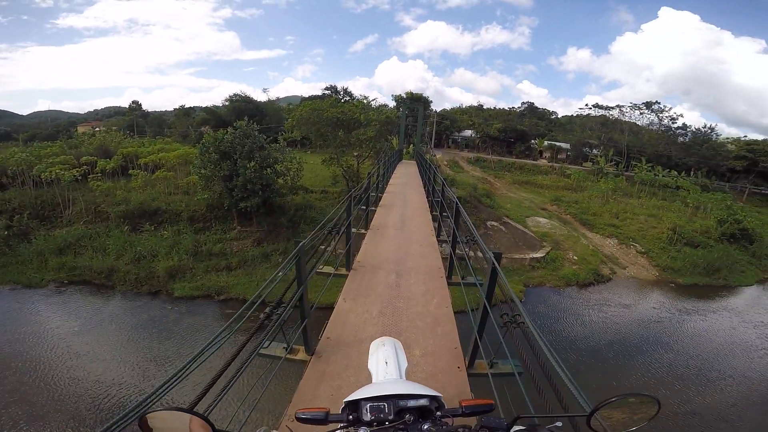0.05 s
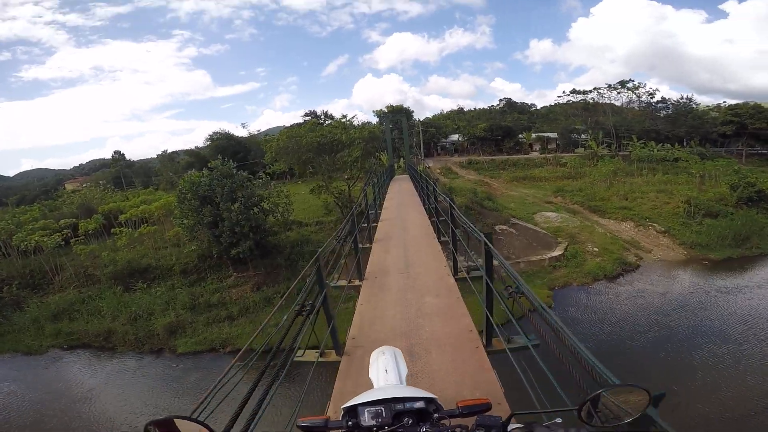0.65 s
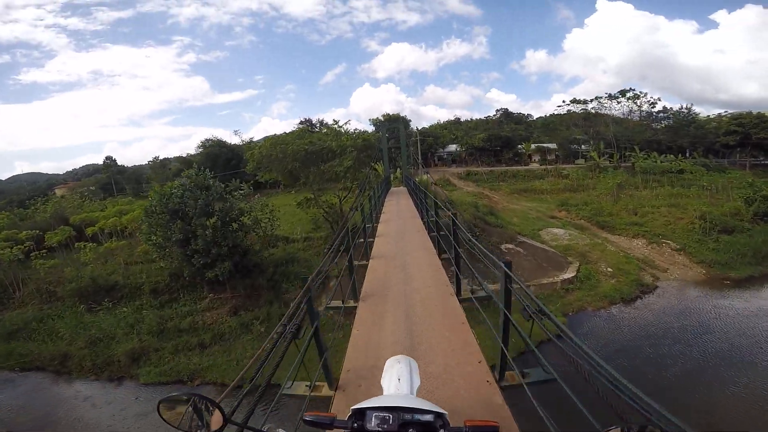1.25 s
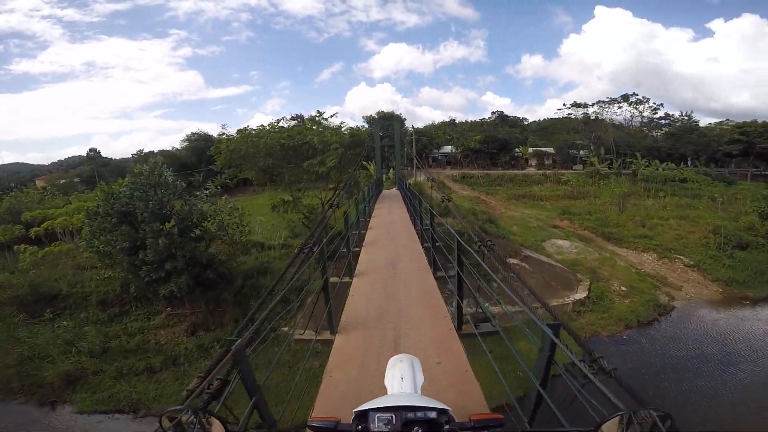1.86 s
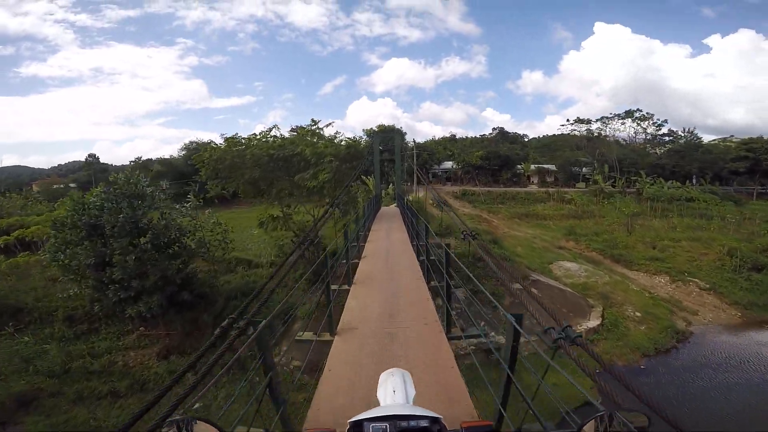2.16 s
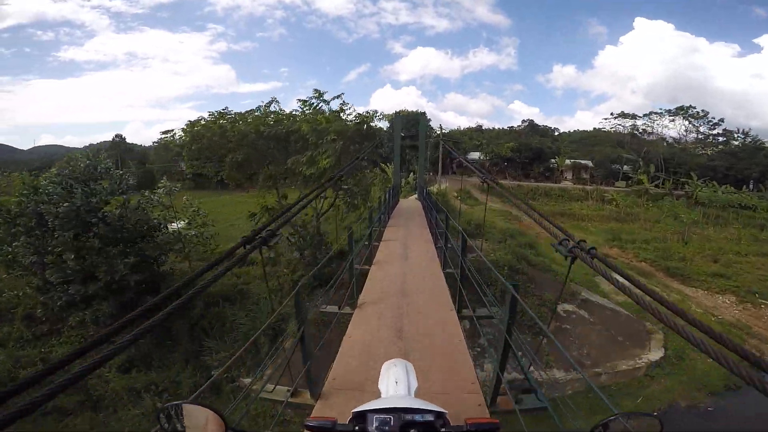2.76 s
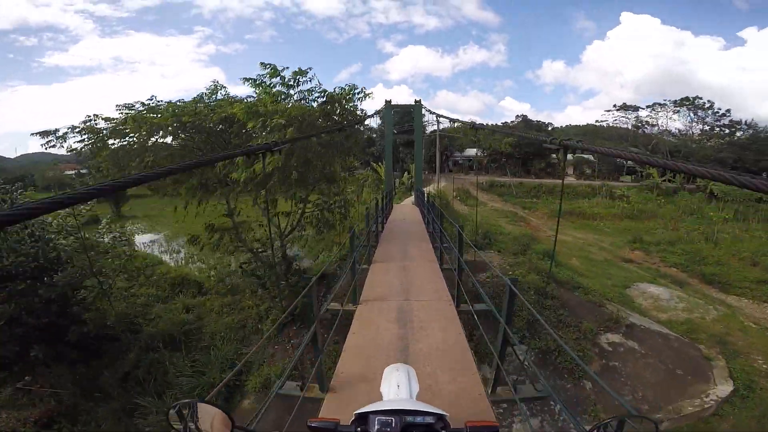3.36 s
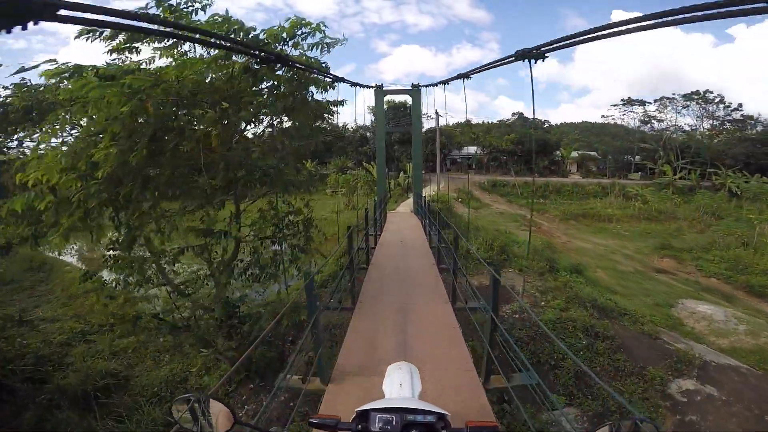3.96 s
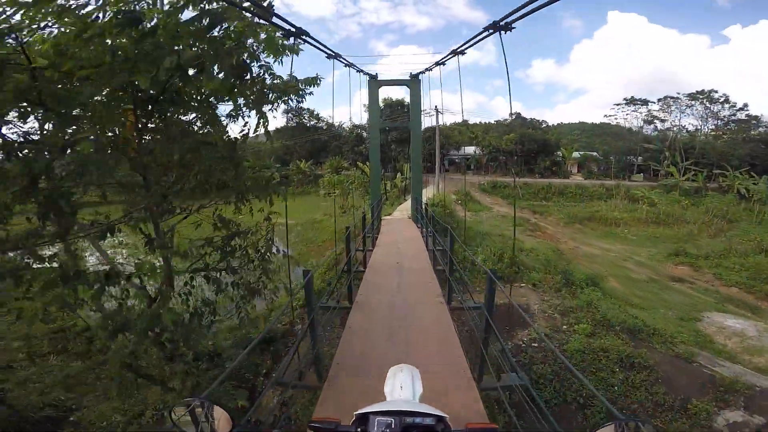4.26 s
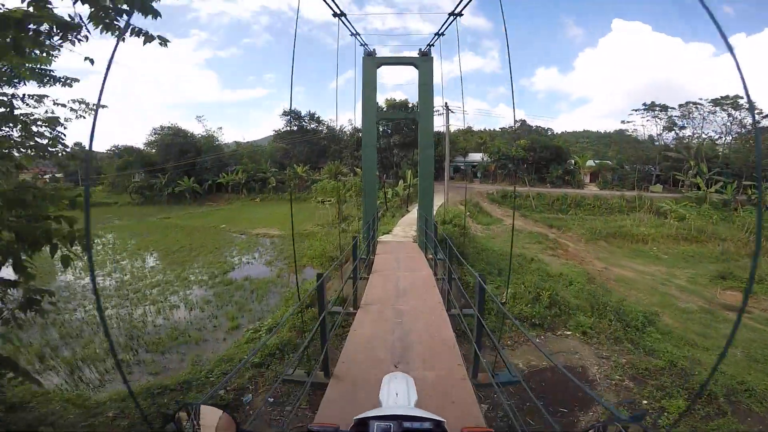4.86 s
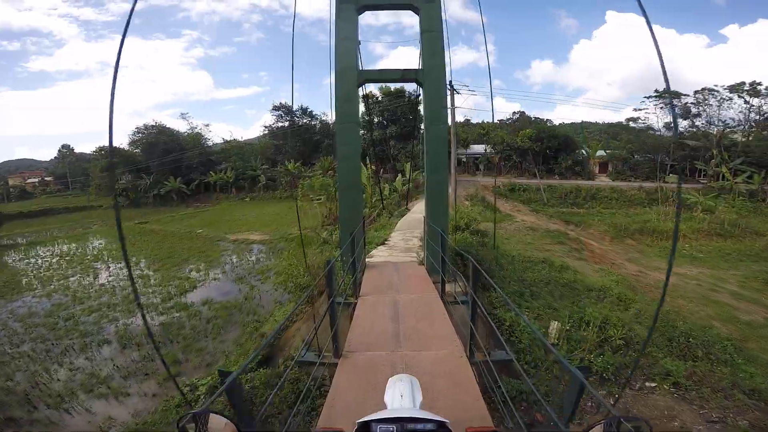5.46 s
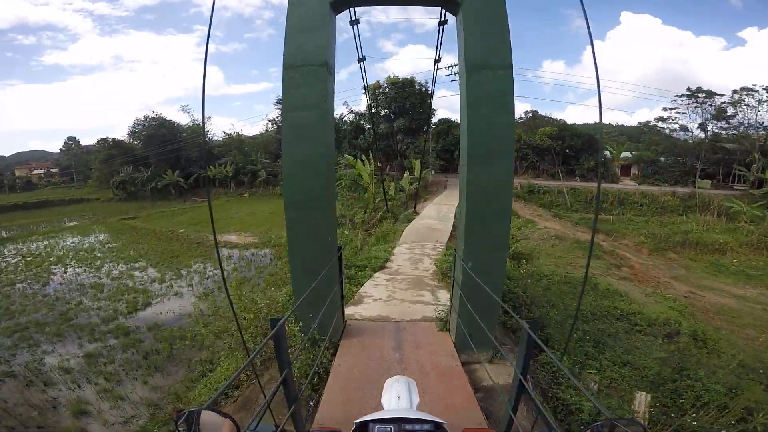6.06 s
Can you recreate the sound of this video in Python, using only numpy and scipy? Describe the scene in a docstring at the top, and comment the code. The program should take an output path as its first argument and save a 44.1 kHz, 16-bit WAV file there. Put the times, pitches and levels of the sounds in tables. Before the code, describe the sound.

A single-cylinder motorcycle putters at low pitch, heard close up from the rider as it crosses a steel suspension bridge. The engine ticks mechanically and carries a light gear whine. Its revs dip just before 1 second, climb steadily until about 3.2 seconds, then fall away as the bike coasts and slows to a low chug. Wind rumble builds on the microphone from about 1 second and stays, gusting most between 3 and 5 seconds. Loose deck plates clank and thud under the wheels, each blow leaving a brief metallic rattle: first around 1.5 seconds, again near 1.9, then in an uneven run from 2.6 to 3.7 and once at 4.2. The densest clatter comes from 4.6 to 5.5 seconds, with a loose bracket banging sharply several times around 4.9. A last pair of clanks lands near 5.8 seconds.

```python
"""A single-cylinder motorcycle crossing a steel-decked suspension bridge, from a camera on the rider.
Close to the microphone the engine follows revs and torque: it putters, pulls with a gear whine,
coasts and brakes. Below, loose deck plates clank under the wheels; each blow leaves the deck rattling
and the main ones jolt the camera. A bracket bangs late in the ride. Wind rumbles right on the
microphone, and the camera housing colours the knocks and noises."""
import sys
import numpy as np
from scipy import signal
from scipy.fft import rfft, irfft
from scipy.io import wavfile
from scipy.ndimage import uniform_filter1d

SR = 44100
rng = np.random.default_rng(int(sys.argv[2]) if len(sys.argv) > 2 else 0)


def to_wav(s):
    """Save 16-bit WAV."""
    ch = np.atleast_2d(s).T  # columns
    pcm = np.round(np.clip(ch, -1, 1) * 32767)  # PCM
    wavfile.write(sys.argv[1], SR, pcm.astype(np.int16))


N = 269451
TIME = np.arange(N) / SR

# engine speed: time_s, firing_hz
REVS = [(0, 24.72), (.3, 25.51), (.6, 24.32), (.9, 22.88), (1.4, 26.9), (1.7, 29.71), (2, 31.63),
        (2.6, 35.42), (2.9, 36.77), (3.2, 37), (3.5, 34.4), (3.8, 32.5), (4.1, 27), (4.4, 23.2), (6.11, 19)]
# engine load: time_s, torque (1 pulling hard, 0 coasting, below 0 engine braking)
TORQUE = [(0, 0.72), (.4, 0.88), (.8, 0.43), (1.8, 0.71), (3.2, 0.87), (3.7, -0.22), (4.15, -0.14),
          (4.4, -0.82), (6.11, -0.44)]
# duct responses at the firing harmonics: frequency_hz, gain_db
EXHAUST_PIPE = [(20, 3), (50, 4), (64, 5.5), (76, -15), (98, -3), (125, -2), (150, -11.5), (180, -46),
                (300, -90)]
AIRBOX = [(100, -20), (170, -8), (230, -3), (280, 0.5), (350, 5), (400, -7), (430, -19), (470, 0),
          (510, 0.5), (580, -27), (700, -31.5), (850, -35)]
# broad spectra of the noises and knocks: frequency_hz, gain_db
PISTON_TONE = [(400, -32), (750, -13), (1050, -1), (1350, -19), (1800, -0.5), (2100, -4), (2420, -4),
               (2650, -6.5), (2950, -10), (4600, -11), (9000, -32), (15000, -54)]
VALVE_TONE = [(100, -26), (330, 1), (480, -2.5), (650, -11.5), (1050, -1.5), (1300, -6), (1600, 1.5),
              (2200, -4), (3000, -0.5), (3650, -5.5), (5100, -11), (6900, -11), (8500, -21), (12000, -24.5),
              (15000, -30)]
BUFFET_TONE = [(6, -2), (14, 1.5), (21, 0.5), (30, 2.5), (45, -2.5), (65, -16), (120, -28.5), (400, -75.5)]
RUSH_TONE = [(20, -4.5), (45, -1.5), (70, 0.5), (97, 4.5), (130, -8.5), (200, -17), (300, -21), (500, -26),
             (800, -30.5), (3000, -68)]
HISS_TONE = [(1000, 10), (4000, 4.5), (8000, -5.5), (11000, 1), (13000, -2.5), (15000, -9)]
PLATE_TONE = [(200, -2), (450, -15), (650, -17.5), (900, -5), (1400, -3), (2200, -0.5), (3000, -4.5),
              (3600, -12), (5500, -17.5), (8000, -23.5), (15000, -41.5)]
CLACK_TONE = [(500, -14.5), (1000, -4), (2500, 1), (4000, 3), (5500, -0.5), (7700, 0.5), (9000, -7.5),
              (11000, -5), (12500, -18), (15000, -17)]
THUD_TONE = [(30, -4.5), (100, 3.5), (180, -3), (270, -5), (340, -10), (450, -11), (650, -26.5),
             (1500, -55)]
BRACKET_TONE = [(500, -24), (1050, -20), (1450, -2), (2200, -3.5), (3000, -4), (3600, -15.5), (5000, -23),
                (10000, -27), (15000, -52)]
# resonances of camera, bike and deck: pitch_hz, width_hz, lift_db
HOUSING_MODES = [(1057, 190, 5.5), (1578, 352, 10.5), (2450, 43, 5), (4636, 190, 9.5), (5587, 400, 9.5),
                 (6850, 590, 3.5)]
MOUNT_MODES = [(21.35, 4.5, 12.5)]
CRANKCASE_MODES = [(1093, 28, 8), (4080, 123, 12), (4750, 175, 6.3), (9850, 200, 9.8), (14150, 220, 7.6)]
FRAME_CAVITIES = [(90, 17, 4.5), (180, 27, 2.5), (237.5, 25, 4), (280.5, 45, 7.5)]
PLATE_MODES = [(1001, 79, 6.2), (1450, 39, 4.4), (2400, 27, 2), (2580, 100, 2.3), (2920, 23, 2.2),
               (3905, 88, 9.9)]
BRACKET_MODES = [(1527, 60, 5.5), (2218, 57, 13), (2486, 120, 9.5), (2990, 50, 11.5), (3850, 100, 10)]
# buffeting on the microphone: time_s, level_db
WIND = [(0, -62.5), (.9, -48), (1.15, -44), (1.62, -40), (2.4, -43.5), (3.05, -38), (4.1, -37),
        (4.45, -42.5), (4.9, -36), (5.2, -47), (6.11, -43.5)]
# deck tremor under the rolling tyres: time_s, level_db
TREMOR = [(0, -71), (1, -57.5), (1.1, -49.5), (1.4, -64), (2.4, -64.5), (3.7, -51.5), (4.4, -56.5),
          (5.1, -46.5), (6.11, -70)]
# main wheel blows on the plates, levels relative within a column: start_s, ring_db, clack_db, thud_db
PLATE_BLOWS = [(1.4792, -33, -52, -56), (1.493, -25, -32, -39), (1.543, -30.5, -38, -39),
               (1.934, -32.5, -51, -43), (2.6346, -32.5, -51, -45), (2.6631, -35, -41.5, -41),
               (2.923, -29, -48, -42), (2.9546, -27, -38.5, -29.5), (3.0784, -54, -45.5, -59),
               (3.261, -26, -34.5, -32), (3.389, -29.5, -39, -48), (3.5036, -34.5, -44, -44.5),
               (3.5861, -34, -50, -38), (3.668, -35.5, -47, -42), (4.1989, -41, -45.5, -41.5),
               (4.6041, -36, -53, -40), (4.6582, -33, -41.5, -39), (4.885, -27, -40.5, -41.5),
               (4.9568, -29.5, -38.5, -41.5), (5.0745, -37, -45.5, -46), (5.1344, -35, -38.5, -39),
               (5.1851, -29.5, -41, -39), (5.2308, -30, -42.5, -45), (5.2806, -26, -34.5, -40),
               (5.436, -34.5, -42.5, -60), (5.4898, -24.5, -37.5, -32.5), (5.8027, -36, -49, -45),
               (5.8365, -27.5, -40.5, -39)]
# the bracket hitting its seat: start_s, level_db
BRACKET_BANGS = [(4.846, -34.5), (4.867, -26), (4.927, -28), (4.988, -34)]


def amp(db):
    """Decibels to gain."""
    return 10 ** (np.asarray(db) / 20)


def unit(x):
    """Scales to rms 1."""
    return x / np.sqrt(np.mean(x ** 2) + 1e-20)


def curve(rows):
    """A timed table, sample by sample."""
    return np.interp(TIME, *np.transpose(rows))


def spectrum_db(tone, hz):
    """A tone table's gain at the given frequencies."""
    f, db = np.transpose(tone)
    return np.interp(np.log(hz + 1), np.log(f + 1), db)


def add(mix, start_s, sound):
    """Mixes a sound in at start_s."""
    part = mix[max(round(start_s * SR), 0):][:len(sound)]
    part += sound[:len(part)]


def drift(hz):
    """Slow random wander of rms 1."""
    f = np.fft.rfftfreq(N, 1 / SR)
    return unit(irfft(rfft(rng.standard_normal(N)) * np.exp(-(f / hz) ** 2), N))


def colour(x, tone, modes=(), size=8192):
    """Path to the microphone, at unit energy: a broad tone, the source's modes and the housing's."""
    f = abs(np.fft.fftfreq(size, 1 / SR))
    db = spectrum_db(tone, f)
    for hz, width_hz, lift_db in [*modes, *HOUSING_MODES]:
        db = db + lift_db / (1 + (2 * (f - hz) / width_hz) ** 2)
    minimum_phase = np.exp(np.conj(signal.hilbert(np.log(amp(db)))))
    ring = np.fft.ifft(minimum_phase).real[:size // 2]
    return signal.oaconvolve(x, ring / np.linalg.norm(ring))[:N]


def contacts(per_s, spread_db):
    """Random metal-to-metal ticks of uneven size."""
    size = amp(spread_db * np.minimum(rng.exponential(1, N), 3.5))
    return unit(size * rng.choice([-1, 1], N) * (rng.random(N) < per_s / SR))


def stroke(cycles, at, length):
    """A burst that comes once an engine cycle and dies away."""
    age = (cycles - at) % 1 / length
    return unit(age * np.exp(-age))


def strike(life_s, spread_db, rise_s=0.00092):
    """Force of one blow: a quick rise, then a dying chatter of uneven rebounds."""
    t = np.arange(SR // 3) / SR
    clumps = unit(uniform_filter1d(rng.standard_normal(len(t)), size=64))
    rebounds = unit(rng.standard_normal(len(t)) * amp(spread_db * clumps))
    return rebounds * (1 - np.exp(-t / rise_s)) * np.exp(-t / life_s)


def puffs(duct, firing_hz, cycles):
    """One puff of gas for each firing, rung through a duct that delays the higher harmonics."""
    phase = 2 * np.pi * (cycles - .25)
    return unit(sum(amp(spectrum_db(duct, k * firing_hz)) * np.cos(k * phase - 0.1205 * k ** 2)
                    for k in range(1, 32)))


def piston_slap(cycles, barrel_hz=2420):
    """The piston slaps twice a cycle: a gritty knock and a short ring of the barrel."""
    slap = unit(0.57 + stroke(cycles, at=0.66, length=0.055)
                + 0.46 * stroke(cycles, at=0.816, length=0.055))
    barrel = unit(np.cos(2 * np.pi * (barrel_hz * TIME + 0.16 * drift(124))))
    grit = colour(slap * rng.standard_normal(N), PISTON_TONE)
    return unit(grit + 1.18 * slap * barrel)


def valve_clatter(cycles):
    """Valve train and chain tick through the crankcase, swelling slightly twice a cycle."""
    swell = (4.1 + 0.19 * stroke(cycles, at=0.196, length=0.056)
             + 0.12 * stroke(cycles, at=0.87, length=0.19))
    return colour(unit(swell * contacts(per_s=12000, spread_db=2.5)), VALVE_TONE, CRANKCASE_MODES)


def gear_whine(cycles, meshes_per_cycle=80):
    """The primary gear sings; uneven crank speed and backlash smear the note."""
    mesh = meshes_per_cycle * cycles + .25 * np.sin(2 * np.pi * cycles) + .33 * drift(65)
    return unit(np.cos(2 * np.pi * mesh) * (1 + .5 * drift(140)))


def engine(cruise_hz=25):
    """The engine just below the rider: all parts lock to the crank and follow revs and torque."""
    firing_hz, torque = curve(REVS), curve(TORQUE)
    cycles = np.cumsum(firing_hz) / SR
    octaves = np.log2(firing_hz / cruise_hz)
    unevenness = 1 + drift(12) / 10  # no two firings are quite equal
    exhaust = amp(-50.5 + 4.7 * torque + 3.8 * octaves) * puffs(EXHAUST_PIPE, firing_hz, cycles)
    intake = amp(-64.5 + 3 * torque + 10.8 * octaves) * puffs(AIRBOX, firing_hz, cycles)
    pulling = np.tanh(np.maximum(torque, 0) / 0.41)
    piston = amp(-53 - 7.5 * octaves) * pulling * piston_slap(cycles)
    valves = amp(-55 + 2.06 * torque + 10.3 * octaves) * valve_clatter(cycles)
    gears = amp(-54.5) * abs(torque) * gear_whine(cycles)  # loaded in either direction
    return unevenness * (exhaust + intake) + piston + valves + gears


def aftermath(life_s, rise_s):
    """Motion left by the main blows: each swells and dies away, and their energies add."""
    energy = np.zeros(N)
    t = np.arange(SR) / SR
    swell = (1 - np.exp(-t / rise_s)) * np.exp(-t / life_s)
    for start_s, ring_db, _, _ in PLATE_BLOWS:
        add(energy, start_s, (amp(ring_db) * swell) ** 2)
    return np.sqrt(energy)


def wind(rush_ceiling_db=-44.5, knee_db=-43.5):
    """At the microphone, buffeting and jolts shake the mount; rushing air grows, then levels off."""
    wind_db = curve(WIND)
    jolt = amp(-11.5) * aftermath(life_s=0.17, rise_s=0.034)
    rush_level = amp(rush_ceiling_db) * np.tanh(amp(wind_db - knee_db))
    buffet = unit(colour(rng.standard_normal(N), BUFFET_TONE, MOUNT_MODES))
    rush = unit(colour(rng.standard_normal(N) * amp(1.9 * drift(32)), RUSH_TONE))
    return np.hypot(amp(wind_db), jolt) * buffet + np.hypot(rush_level, amp(-6) * jolt) * rush


def hiss(level_db=-63):
    """Faint steady hiss at the microphone."""
    return amp(level_db) * colour(rng.standard_normal(N), HISS_TONE, modes=[(9390, 290, 9.5)])


def deck_rattle():
    """The deck shakes around the wheels in clumps of small knocks, most of all after a main blow."""
    after_blows = amp(-15.5) * aftermath(life_s=0.14, rise_s=0.023)
    level = np.hypot(amp(curve(TREMOR)), after_blows)
    shake = level * unit(amp(2.17 * drift(19.5)))
    knocks = colour(shake * contacts(per_s=1200, spread_db=0.83), PLATE_TONE, PLATE_MODES)
    drumming = colour(shake * rng.standard_normal(N), THUD_TONE)
    return knocks + amp(-1) * drumming


def small_blows(per_s=6.5, spread_db=1.5):
    """Lesser blows at random moments, following the deck's tremor; rows as in PLATE_BLOWS."""
    when, strength = rng.random((round(per_s * N / SR), 2)).T
    starts_s = when * N / SR
    levels_db = np.interp(starts_s, *np.transpose(TREMOR)) + spread_db * (2 * strength - 1)
    return [(start_s, db + 15, db, db + 1) for start_s, db in zip(starts_s, levels_db)]


def deck_plates(rebound_s=.027):
    """Under the wheels a plate clacks on its bearers, rings, thuds up the frame and falls back once."""
    ring, clack, thud = np.zeros((3, N))
    pulse = np.hanning(round(.002 * SR))
    shove = 14 * pulse / pulse.sum()  # the tyre's first push on the plate
    for start_s, ring_db, clack_db, thud_db in PLATE_BLOWS + small_blows():
        for delay_s, ring_drop_db, clack_drop_db in ((0, 0, 0), (rebound_s, 4, 15.5)):
            hit_s = start_s + delay_s
            add(ring, hit_s, amp(ring_db - ring_drop_db) * strike(life_s=0.039, spread_db=0.2))
            add(clack, hit_s, amp(clack_db - clack_drop_db) * strike(life_s=0.02, spread_db=-0.5))
        add(thud, start_s, amp(thud_db) * shove)
        add(thud, start_s, amp(thud_db) * strike(life_s=0.037, spread_db=-0.3))
    return (0.33 * colour(ring, PLATE_TONE, PLATE_MODES)
            + 0.93 * colour(clack, CLACK_TONE)
            + 0.65 * colour(thud, THUD_TONE, FRAME_CAVITIES))


def bracket():
    """A loose steel bracket bangs and buzzes against its seat, ringing in its own modes."""
    force = np.zeros(N)
    for start_s, level_db in BRACKET_BANGS:
        add(force, start_s, amp(level_db) * strike(life_s=0.013, spread_db=2.5))
    return colour(force, BRACKET_TONE, BRACKET_MODES)


def tink(start_s=5.888, pitch_hz=11750, life_s=0.0027):
    """A tiny metal part pings once."""
    t = np.arange(SR // 10) / SR
    envelope = amp(-46) * t / life_s * np.exp(-t / life_s)
    ping = np.zeros(N)
    add(ping, start_s, envelope * np.sin(2 * np.pi * pitch_hz * t))
    return ping


def scene():
    """Bike, bridge and wind at one microphone on the rider."""
    return (engine() + deck_plates() + bracket() + tink() + deck_rattle() + wind() + hiss())[None]


def record(dry, cutoff_hz=15450):
    """The camera's band limit takes off the highest treble."""
    lowpass = signal.firwin(511, cutoff_hz, window=("kaiser", 9), fs=SR)
    return signal.oaconvolve(dry, lowpass[None], "same")


dry = scene()
out = record(dry)
to_wav(out)
```